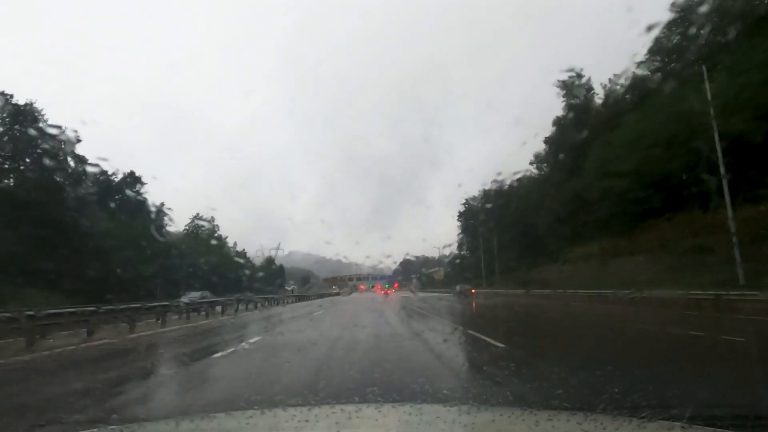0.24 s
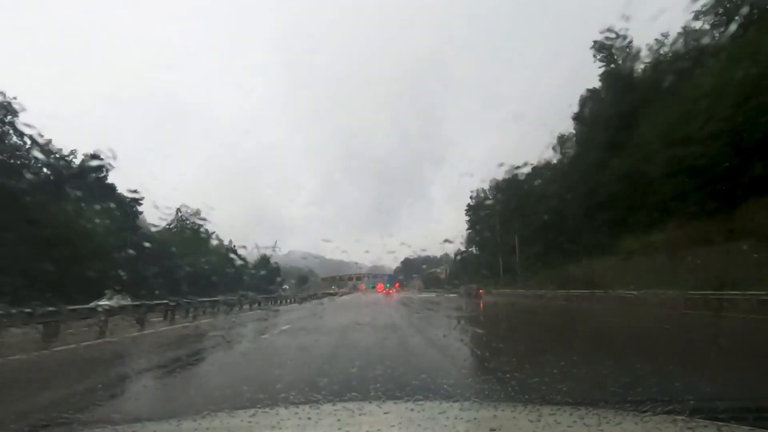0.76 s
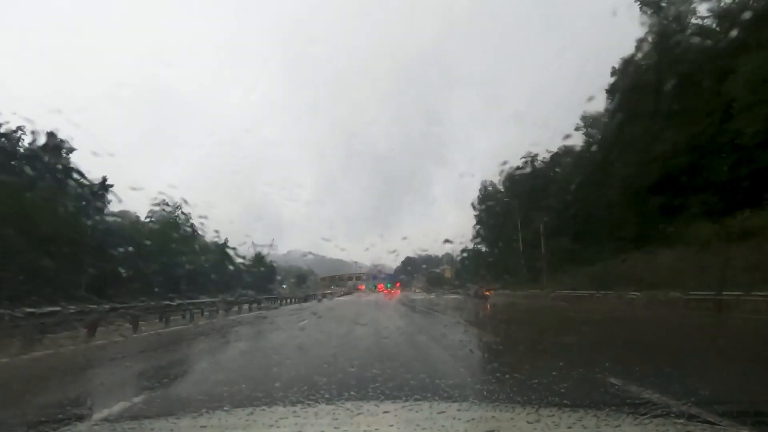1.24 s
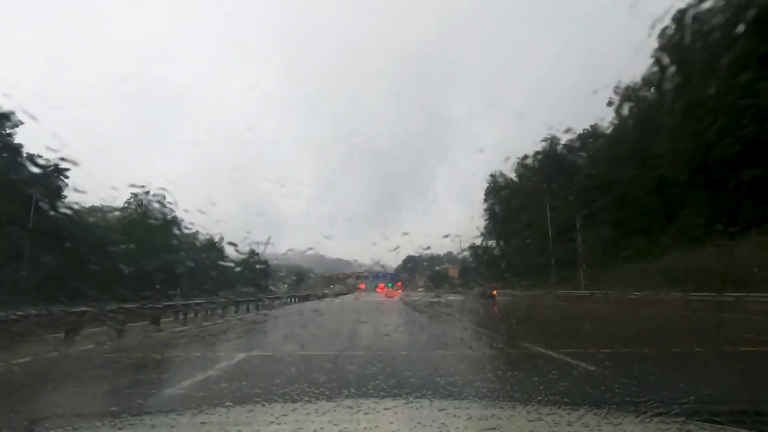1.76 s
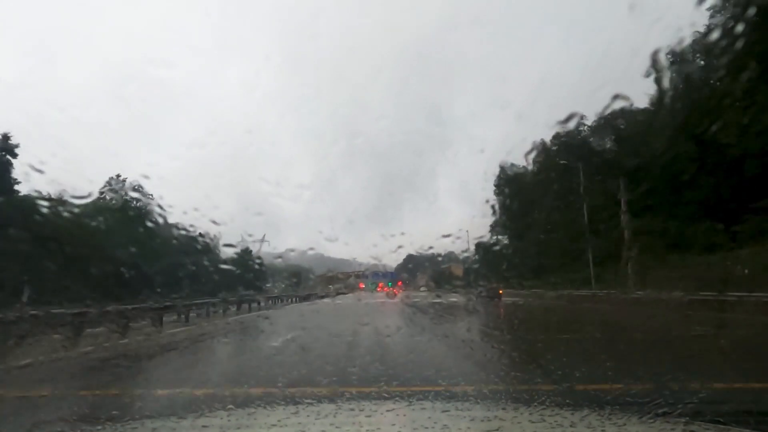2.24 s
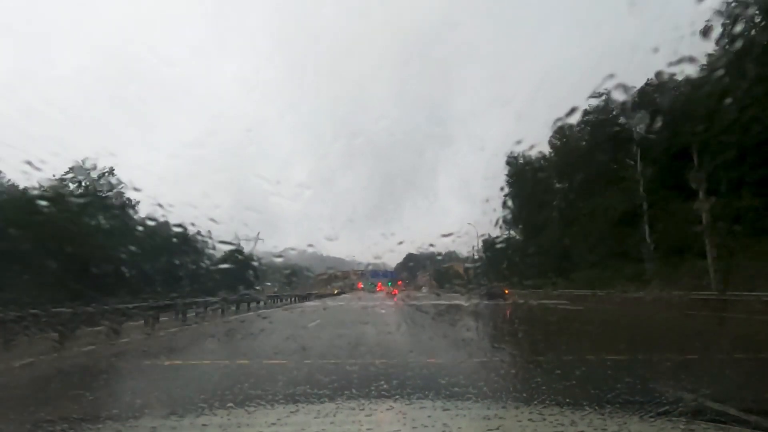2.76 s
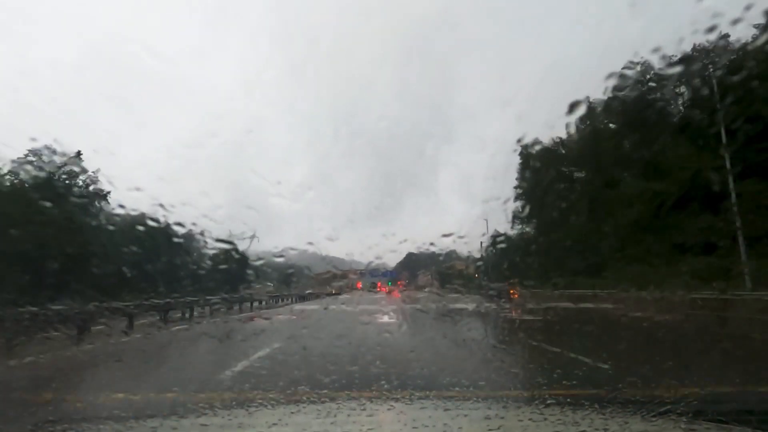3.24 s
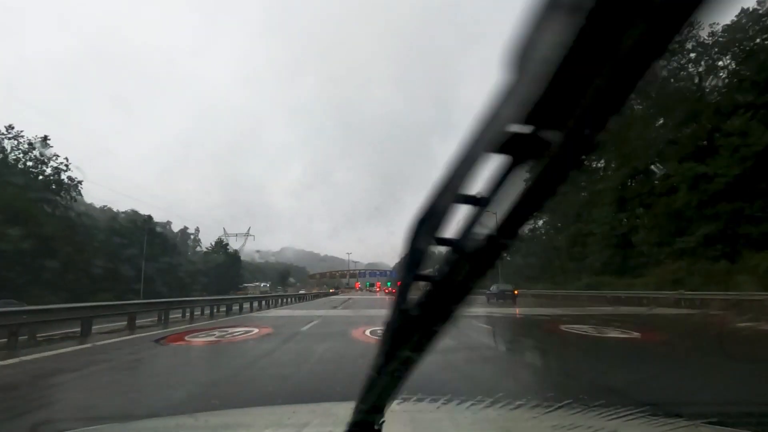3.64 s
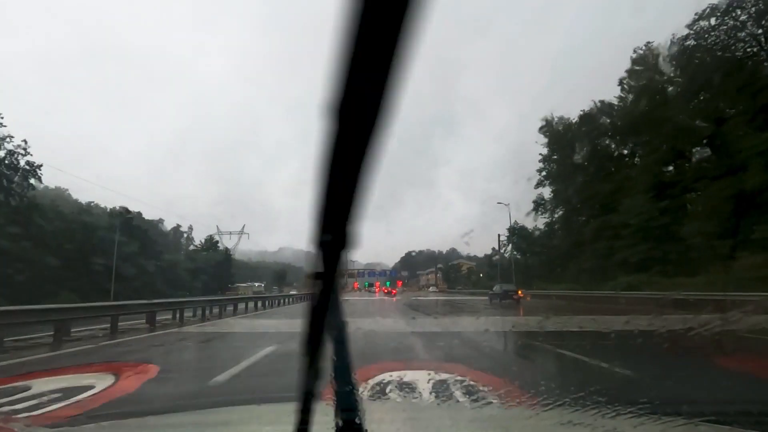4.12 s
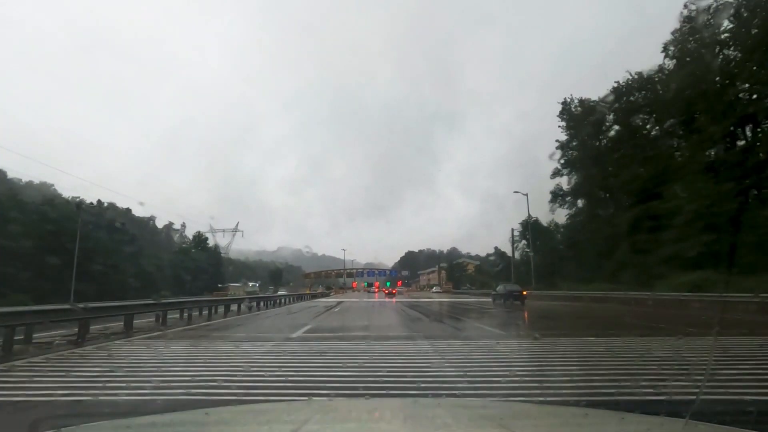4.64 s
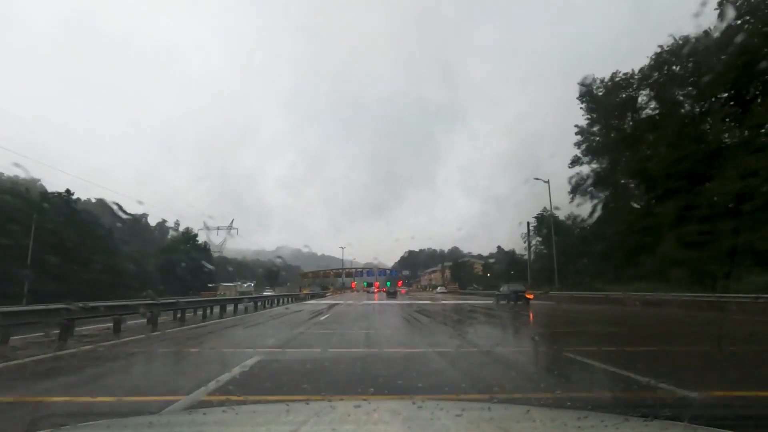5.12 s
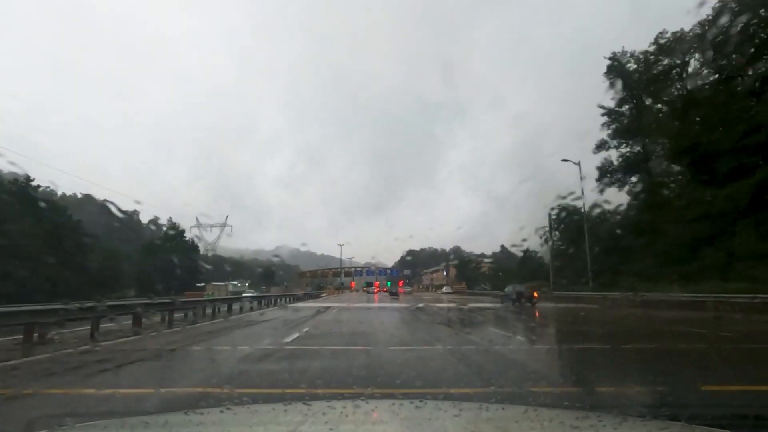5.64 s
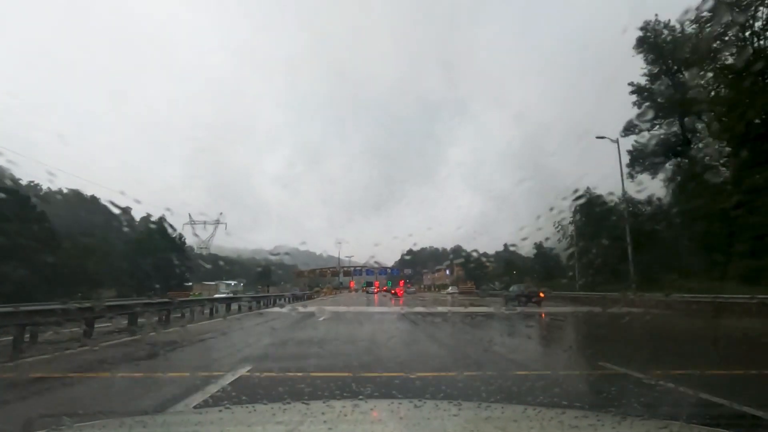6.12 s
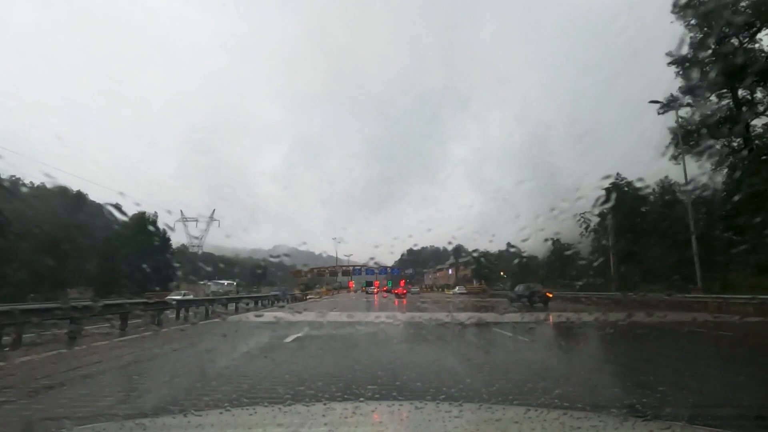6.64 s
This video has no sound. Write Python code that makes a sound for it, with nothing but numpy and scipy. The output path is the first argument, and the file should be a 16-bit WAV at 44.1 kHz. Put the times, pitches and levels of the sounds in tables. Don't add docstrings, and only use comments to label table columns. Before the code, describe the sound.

Booming wet-road rumble in a car cabin; a wiper scrapes and squeaks once, then the wheels drum across raised strips, rattling the dashboard, before quieter rolling.

```python
import sys
import numpy as np
from scipy import signal
from scipy.io import wavfile
from scipy.ndimage import uniform_filter1d

SR = 44100
rng = np.random.default_rng(int(sys.argv[2]) if len(sys.argv) > 2 else 0)


def persist_wave(psi):
    counts = np.round(np.clip(psi, -1, 1) * 32767).astype(np.int16)
    wavfile.write(sys.argv[1], SR, np.atleast_2d(counts).T)


def gain_from_db(level_db):
    decades = np.asarray(level_db, float) / 20
    return 10 ** decades


N = 302967

# (time [s], pitch [Hz], level [dB])
FIRING_TONE = [(0.0, 75.82, -24), (0.6, 73.5, -25.5), (1.43, 68.6, -23), (2.08, 65.05, -24.5),
               (2.81, 62.2, -22), (3.2, 60.05, -34), (4.07, 56.1, -34), (4.58, 52.8, -32.5),
               (4.7, 51.6, -56.5), (6.2, 49.15, -54.5), (6.35, 48.98, -39), (6.62, 48.1, -41),
               (6.87, 45.3, -18.5)]
# (time [s], level [dB], length [s])
LOAD_SURGES = [
    (0.0, -36, 0.28),
    (1.09, -36, .12),
    (1.462, -33.5, 0.087),
    (2.866, -20.5, 0.044),
    (3.21, -21, 0.1),
    (3.374, -35, 0.022),
    (3.55, -23, 0.025),
    (3.72, -30.5, 0.21),
    (6.444, -25.5, 0.11),
    (6.697, -19, 0.051),
]
# (time [s], level [dB])
ROLLING = [(0.0, 0), (0.8, 0), (1.8, -1), (2.6, -1), (3.1, -3.5), (3.4, -1.5), (4.1, -3.5), (4.45, -1.5),
           (5.0, -2.5), (5.5, -0.5), (5.6, -5.5), (5.78, -8), (6.0, -9), (6.35, -6.5), (6.87, -5.5)]
# (time [s], level [dB], length [s])
THUD_SWELLS = [(0.0, -22.5, 0.12), (0.327, -22, 0.14), (0.69, -21, 0.13), (1.002, -23.5, 0.063),
               (1.388, -20.5, 0.41), (1.77, -28, 0.088), (2.18, -19, 0.097), (2.506, -23, 0.15),
               (2.9, -19, 0.091), (3.234, -17, 0.12), (3.569, -14.5, 0.092), (3.943, -22, 0.14),
               (4.652, -20.5, 0.28), (4.998, -28, 0.066), (5.404, -29, 0.31), (5.71, -31, 0.18),
               (6.128, -21.5, 0.081), (6.429, -27.5, 0.052), (6.734, -29.5, 0.11)]
# (frequency [Hz], density [dB per Hz])
THUD_COLOUR = [(7.1, -30.5), (12, 6.5), (54, 2.5), (70, -3), (90, -4.5), (120, -37.5), (200, -120)]
# (frequency [Hz], density [dB per Hz])
ROAR_COLOUR = [(50, -28.5), (85, -3.5), (97, -9), (128, -0.5), (172, -7), (304, -11), (397, -22),
               (433, -17.5), (520, -23.5), (720, -23), (841, -32), (1120, -30), (2500, -51.5), (3250, -72),
               (5500, -120)]
# (frequency [Hz], density [dB per Hz])
SPRAY_COLOUR = [(1350, 1), (2300, -1.5), (4720, -10), (6450, -18), (8820, -27.5), (10600, -37),
                (11300, -45.5), (12300, -34.5), (12900, -51), (13800, -56.5), (14900, -62.5), (15600, -50)]
# (time [s], level [dB], length [s])
PUDDLE_SPRAY = [
    (0.85, -67.5, 0.28),
    (2.7, -77, 0.42),
    (3.754, -65, 0.082),
    (4.501, -70, 0.44),
    (6.3, -81, 0.071),
]
# (frequency [Hz], width [Hz], level [dB])
PANEL_MODES = [(254.4, 23, -44.5), (307, 29, -48.5), (446, 62, -56.5), (655, 24, -54.5), (919, 22, -57.5)]
# (time [s], length [s], level [dB])
STRIP_THUMPS = [
    (5.16, 0.04, -17),
    (5.273, 0.041, -21.5),
    (5.442, 0.045, -18),
    (5.573, 0.037, -19.5),
    (5.64, 0.039, -17),
    (5.753, 0.058, -15.5),
    (5.857, 0.044, -29),
]
# (time [s], rate [strips per s])
STRIP_RATE_CURVE = [(5.05, 38.2), (5.78, 39.6), (5.9, 35.7)]
# (time [s],
# length [s], pitch [Hz], glide [Hz per s], level [dB])
CABIN_HUMS = [(5.122, .03, 124.8, -100, -20.5), (5.13, 0.041, 86.5, -80, -20.5),
              (5.225, 0.032, 121.4, 0.1, -19.5), (5.2, 0.041, 72.8, 0.1, -20),
              (5.335, .06, 76.06, -0.5, -16), (5.38, .035, 117.7, 4, -21), (5.47, 0.054, 75.4, -4, -19.5),
              (5.505, .04, 127.8, 51, -21.5), (5.58, .05, 82.1, -41, -19.5), (5.61, .035, 120.2, 0.1, -22),
              (5.695, 0.027, 71.6, -50, -18.5), (5.75, .045, 117.2, -41, -21.5),
              (5.185, 0.038, 192.2, 80, -25.5), (5.36, .04, 202, -81, -28), (5.5, .025, 250.5, 0.1, -30.5),
              (5.675, .03, 266.1, -1, -35), (5.12, .025, 235, 300, -34), (5.345, .04, 275, 100, -33),
              (5.42, .03, 170, -200, -29), (5.5, .025, 320, 0.1, -35), (4.9, .03, 185, 0.1, -28),
              (1.55, .12, 145, 0.1, -33), (5.89, .03, 126.7, 0.1, -31), (6.04, 0.036, 127, 62, -32.5),
              (0.35, .15, 127, 1.6, -32.5), (0.2, .2, 150, -5, -32.5), (3.38, 0.11, 120, 0.1, -32.5)]
# (time [s], level [dB], length [s])
TRIM_BUZZ = [
    (5.08, -54, 0.042),
    (5.17, -33.5, 0.032),
    (5.385, -34, 0.068),
    (5.496, -35, 0.05),
    (5.652, -41.5, 0.04),
    (5.6, -46, .04),
    (5.717, -40, 0.034),
    (5.773, -43.5, 0.053),
]
# (frequency [Hz], density [dB per Hz])
TRIM_COLOUR = [(210, -14), (350, -11.5), (526, -5), (812, -2), (1170, -15.5), (1590, -14.5), (4020, -49.5),
               (6660, -47), (10000, -64), (13000, -94), (22000, -120)]
# (time [s], level [dB])
SUSPENSION_JOLTS = [
    (5.104, -28),
    (5.137, -23.5),
    (5.23, -34),
    (5.322, -28.5),
    (5.41, -29),
    (5.503, -29),
    (5.66, -39.5),
    (5.73, -38),
]
# (time [s], level [dB], length [s])
WIPER_SCRAPES = [(3.371, -34.5, 0.016), (3.405, -33, 0.014), (3.442, -37.5, 0.018), (3.464, -36.5, 0.011),
                 (3.504, -32, 0.0082), (3.533, -47, 0.02), (3.588, -43, 0.03), (3.65, -40, 0.018),
                 (3.698, -40, 0.056), (3.736, -36, 0.032), (3.77, -35, 0.021), (3.798, -35, 0.027),
                 (3.84, -45, .04), (3.873, -38, 0.012), (3.92, -30.5, 0.038), (3.97, -40.5, .04)]
# (frequency [Hz], density [dB per Hz])
RUBBER_COLOUR = [(180, -23), (300, 7.5), (385, 3), (682, 2.5), (826, -4), (1090, -5), (1720, -13),
                 (2630, -27.5), (3140, -26.5), (10000, -57), (13000, -70), (22000, -120)]
# (frequency [Hz], width [Hz], level [dB])
ARM_MODES = [(1086, 90, -8), (1440, 80, -14), (1840, 60, -24), (2210, 140, -22), (2640, 90, -27),
             (2930, 50, -28), (3690, 60, -33)]
# (time [s], level [dB], length [s])
RUBBER_SQUEAL = [
    (3.75, -56, 0.025),
    (3.801, -62, .02),
    (3.838, -52, .024),
    (3.885, -66, .012),
]
SQUEAL_HARMONICS = [-12, -9, -4, -2, -2, -12, -6, -14, -12]
# (time [s], length [s], pitch [Hz], level [dB])
TURN_SQUEAKS = [
    (3.92, .004, 2620, -42),
    (3.946, .009, 2570, -50),
    (3.962, .009, 2630, -56),
    (3.95, .008, 2950, -58),
    (3.972, .008, 2720, -57),
    (3.982, .007, 2900, -52),
]
# (time [s], length [s], pitch [Hz], glide [Hz per s], level [dB])
GLASS_GROANS = [(3.745, .05, 475, 448, -38.5), (3.73, .03, 720, 150, -43), (3.755, 0.023, 1105, 500, -43),
                (3.765, 0.026, 172.3, 100, -27.5), (3.795, 0.0149, 1062, 300, -40),
                (3.805, 0.018, 676, 600, -38), (3.79, .015, 1225, 300, -46), (3.79, .015, 1400, 200, -46),
                (3.84, .035, 1463, 200, -53), (3.872, .013, 304, 0.1, -34), (3.874, 0.012, 618, -1, -41),
                (3.875, 0.012, 921, 0.1, -48), (3.93, .016, 241.4, -500, -20),
                (3.965, 0.0072, 239, 500, -20), (3.985, .016, 254, 100, -27), (3.92, 0.018, 925, 0.1, -48)]
# (time [s], crack level [dB], knock level [dB])
TRIM_TICKS = [(1.9786, -44, -44), (3.276, -42, -43), (3.372, -45, -41), (3.386, -37, -34),
              (3.399, -51, -40.5), (3.436, -44, -44), (3.498, -33, -40), (3.726, -48, -36),
              (3.742, -48, -34), (3.786, -50, -36), (3.792, -49, -37), (3.899, -36, -40), (3.918, -50, -35),
              (4.5034, -33, -59), (5.098, -53, -47), (5.194, -43, -49), (5.318, -50, -41),
              (5.337, -38, -37), (5.3661, -38, -34), (5.3921, -35, -35), (5.407, -41, -41),
              (5.418, -38, -37), (5.433, -42, -42), (5.444, -35, -35), (5.47, -35, -33), (5.485, -42, -42),
              (5.4989, -33, -35), (5.517, -39, -39), (5.54, -44, -43), (5.626, -40, -40), (5.652, -38, -39),
              (5.679, -39, -40), (5.698, -48, -42), (5.7088, -41, -43), (6.201, -44, -48),
              (6.2639, -46, -39), (6.3264, -47, -53), (6.816, -49, -53)]
# (time [s], level [dB], pitch [Hz], decay by 60 dB [s])
SHORT_RINGS = [(3.384, -59, 3250, 0.022), (3.397, -30, 1050, .045), (3.404, -36, 900, .03),
               (3.372, -53, 2000, .03), (3.425, -35, 750, 0.044), (3.436, -43, 1600, 0.031),
               (3.74, -40, 1100, .06), (3.745, -41, 1420, 0.046), (3.786, -40, 1250, .02),
               (3.8, -33, 684, .05), (3.99, -48, 1750, .03), (5.338, -43.5, 1590, .025),
               (5.444, -45, 1700, .02), (5.627, -45, 1600, .025), (5.652, -46, 1850, .022),
               (5.679, -49, 1800, .025), (5.709, -45, 1600, .02), (5.33, -58, 4700, .015),
               (4.89, -21, 304, 0.11), (5.097, -18, 219, 0.15), (5.128, -17, 188, 0.14),
               (6.327, -38, 700, .02), (6.816, -40, 800, .02), (3.497, -33, 650, .03),
               (3.392, -29, 700, 0.033), (3.4, -46, 1640, .035), (3.498, -48, 3000, .015),
               (4.503, -43, 3480, .016), (4.503, -50, 4600, .01), (6.201, -52, 4000, .012),
               (5.194, -49, 3530, .022), (5.271, -45, 2050, .03), (5.297, -47, 3475, .022),
               (5.366, -46, 3250, .022), (5.393, -44, 3250, .02), (5.469, -42.5, 2610, .02),
               (5.498, -43, 2930, .014), (5.499, -44, 2100, .015), (5.626, -52, 2470, .025),
               (5.652, -57, 3350, .018), (5.679, -48, 2620, .018), (6.265, -53, 3100, .018)]
# (time [s], level [dB], pitch [Hz])
METAL_CHINKS = [(5.1627, -58, 6770), (5.3981, -56, 6660), (5.418, -50, 6600), (5.4264, -55, 6470),
                (5.4967, -52, 6720), (5.5054, -49, 6770), (5.5164, -59, 6890), (5.5253, -51, 6730),
                (5.5432, -59, 6390), (5.5498, -58, 6790), (5.658, -66, 6590)]
# (time [s], level [dB])
HISS_PUFFS = [(3.2744, -60), (3.753, -61), (3.899, -59.5), (5.396, -60.5), (5.505, -58), (5.632, -70),
              (6.1, -72), (6.66, -74), (6.2228, -68), (6.261, -54), (6.3242, -61), (6.835, -68)]


def engine():
    hz, db = follow(FIRING_TONE)
    level = gain_from_db(db) + swells(*np.transpose(LOAD_SURGES))
    return level * (tone(hz) + gain_from_db(-7) * tone(hz / 2) + gain_from_db(-24) * tone(hz * 2))


def road():
    rolling_db, = follow(ROLLING)
    floor_pan = gain_from_db(-4) * rumble(hz=37, width=12)
    rocking = gain_from_db(-25.5) + swells(*np.transpose(THUD_SWELLS))
    thud = rocking * gain_from_db(-5) * (noise(THUD_COLOUR, patchy_db=-1.45, size=8192) + floor_pan)
    roar = gain_from_db(rolling_db - 25.5) * noise(ROAR_COLOUR, patchy_db=1.0)
    tyres = thud + roar
    tyres -= 0.62 * resonate(tyres, follow(FIRING_TONE)[0], width=11)

    boom_db = -32.5 + 1.2 * (rolling_db - rolling_db.mean())
    boom = gain_from_db(boom_db) * rumble(hz=120.6, width=13)
    panels = np.zeros(N)
    for hz, width, db in PANEL_MODES:
        panels += gain_from_db(db) * evened(resonate(rng.standard_normal(N), hz, width))
    panels = gain_from_db(rolling_db) * bandpass(panels, 2, 200, 1300)

    wetness = gain_from_db(-54.5 + 0.99 * rolling_db) + swells(*np.transpose(PUDDLE_SPRAY))
    spray = wetness * noise(SPRAY_COLOUR, patchy_db=0.9, size=1024)
    return tyres + boom + panels + spray


def strips():
    rate, = follow(STRIP_RATE_CURVE)
    s, length, db = np.transpose(STRIP_THUMPS)
    drumming = swells(5.5, -23.5, rise=0.67, fall=0.6)
    thumps = (drumming + swells(s, db, length)) * tone(rate) + hums(CABIN_HUMS)

    t = np.arange(2000) / SR
    flare = 1.3 * np.exp(-t / 0.005) * np.minimum(t / 0.0015, 1)
    flares = np.full(N, 0.45)
    for s, *_ in TRIM_TICKS:
        add(flares, s, flare)
    buzz = swells(*np.transpose(TRIM_BUZZ)) * flares
    buzz *= gain_from_db(-2.5) * noise(TRIM_COLOUR, patchy_db=0.5, size=512)

    jolts = swells(*np.transpose(SUSPENSION_JOLTS), rise=0.027, fall=0.039)
    return thumps + buzz + jolts * gain_from_db(-3.5) * rumble(hz=190, width=160)


def wiper():
    scrape = noise(RUBBER_COLOUR, patchy_db=-1.0, size=512)
    slips = rng.standard_normal(N)
    arm = np.zeros(N)
    for hz, width, db in ARM_MODES:
        arm += gain_from_db(db) * evened(resonate(resonate(slips, hz, width), hz, width))
    drag = swells(*np.transpose(WIPER_SCRAPES)) * gain_from_db(-3.5)
    out = drag * (scrape + gain_from_db(-8.5) * evened(arm))

    squeal = swells(*np.transpose(RUBBER_SQUEAL))
    slip_rate = np.interp(np.arange(N) / SR, (3.7, 3.885), (356, 370))
    slip_rate *= 1 + 0.007 * wander(300)
    for k, db in enumerate(SQUEAL_HARMONICS, start=2):
        out += squeal * gain_from_db(db + 2.5 * wander(700)) * tone(slip_rate, k)

    uneven = 1 + 0.028 * wander(120)
    for s, length, hz, db in TURN_SQUEAKS:
        rising = hz + 2500 * (np.arange(N) / SR - s)
        out += swells(s, db, length) * tone(rising * uneven)
    return out + hums(GLASS_GROANS)


def ticks():
    out, t = np.zeros(N), np.arange(2000) / SR
    rattle = rng.standard_normal((len(TRIM_TICKS), len(t)))
    click = t == 0
    cracks = bandpass(0.05 * rattle * np.exp(-t / 0.004) + click, 3, 1050, 2600)
    knocks = bandpass(0.09 * rattle * np.exp(-t / 0.007) + click, 3, 450, 1700)
    for (s, crack_db, knock_db), crack, knock in zip(TRIM_TICKS, cracks, knocks):
        add(out, s, gain_from_db(crack_db - 2) * crack / crack.max())
        add(out, s, gain_from_db(knock_db + 1) * knock / knock.max())
    for s, db, hz, t60 in SHORT_RINGS:
        add(out, s, ring(db, hz, t60))
    for s, db, hz in METAL_CHINKS:
        add(out, s, ring(db - 1, hz, t60=0.025))
        add(out, s, ring(db - 9, hz * 1.03, t60=0.024))
        add(out, s, ring(db - 11, hz * 0.77, t60=0.02))
    return out


def splashes():
    out, t = np.zeros(N), np.arange(1500) / SR
    puffs = evened(bandpass(rng.standard_normal((len(HISS_PUFFS), len(t))), 2, 6500, 13500))
    burst = np.exp(-t / 0.011) * np.minimum(t / 0.005, 1)
    for (s, db), puff in zip(HISS_PUFFS, puffs):
        add(out, s, gain_from_db(db - 9.5) * puff * burst)
    return out


def rain():
    drops_per_s = 660
    drops = gain_from_db(5 * np.minimum(rng.exponential(1, N), 2.8)) * (rng.random(N) < drops_per_s / SR)
    patch = rng.integers(0, 8, N)
    out, t = np.zeros(N), np.arange(400) / SR
    for k, hz in enumerate(np.geomspace(900, 7500, num=8)):
        tap = np.exp(-t * hz / 2.5) * np.sin(2 * np.pi * hz * t) * (900 / hz) ** 4.5
        out += signal.oaconvolve(drops * (patch == k), tap)[:N]
    return gain_from_db(-65) * evened(out)


def evened(x):
    return x / np.sqrt(np.mean(x ** 2) + 1e-20)


def follow(rows):
    s, *columns = np.transpose(rows)
    return [np.interp(np.arange(N) / SR, s, c) for c in columns]


def add(mix, s, sound):
    part = mix[round(s * SR):][:len(sound)]
    part += sound[:len(part)]


def tone(hz, k=1):
    return np.sqrt(2) * np.cos(2 * np.pi * k * np.cumsum(hz) / SR)


def ring(db, hz, t60):
    t = np.arange(4000) / SR
    start = np.sin(np.pi / 2 * np.minimum(t / 0.00068, 1)) ** 2
    return gain_from_db(db - 60 * t / t60) * np.sin(2 * np.pi * hz * t) * start


def swells(s, db, rise, fall=None):
    fall = rise if fall is None else fall
    ms = np.arange(0, N / SR + 0.001, 0.001)
    lag = ms[:, None] - s
    bells = gain_from_db(db) * np.exp(-(lag / np.where(lag < 0, rise, fall)) ** 2)
    return np.interp(np.arange(N) / SR, ms, bells.sum(axis=1))


def hums(rows):
    out = np.zeros(N)
    for s, length, hz, glide, db in rows:
        t = np.arange(-3 * length, 3 * length, 1 / SR)
        sound = gain_from_db(db) * np.exp(-(t / length) ** 2) * tone(hz + glide * t)
        before_start = max(round((3 * length - s) * SR), 0)
        add(out, max(s - 3 * length, 0), sound[before_start:])
    return out


def wander(size):
    return evened(uniform_filter1d(rng.standard_normal(N), size=size))


def bandpass(x, order, low, high):
    return signal.sosfilt(signal.butter(order, [low, high], "bandpass", fs=SR, output="sos"), x)


def resonate(x, hz, width):
    turn = np.exp(2j * np.pi * np.cumsum(hz * np.ones(len(x))) / SR)
    r = np.exp(-np.pi * width / SR)
    return 2 * (turn * signal.lfilter([1 - r], [1, -r], x / turn)).real


def rumble(hz, width):
    return evened(resonate(resonate(rng.standard_normal(N), hz, width), hz, width))


def noise(shape, patchy_db, size=2048):
    hop, hz = size // 4, np.fft.rfftfreq(size, 1 / SR)
    a, b, patches = rng.standard_normal((N // hop + 5, len(hz), 3)).T
    patches = uniform_filter1d(uniform_filter1d(patches, size=16, axis=0), size=8, axis=1)
    f, db = np.transpose(shape)
    colour = np.interp(np.log(hz + 1), np.log(f + 1), db, left=-90, right=-120)
    z = (a + 1j * b) * gain_from_db(colour[:, None] + patchy_db * evened(patches))
    return evened(signal.istft(z, nperseg=size, noverlap=size - hop)[1][:N])


def gate(x):
    hz, _, z = signal.stft(x, SR, nperseg=2048)
    power = uniform_filter1d(uniform_filter1d(abs(z) ** 2, size=24, axis=1), size=4, axis=2)
    limit = np.median(power[:, np.searchsorted(hz, 10500)])
    ease_db = np.clip(0.0045 * (hz - 9600), 0, 8)
    limit = limit / gain_from_db(ease_db)[:, None] ** 2
    return signal.istft(z * (power > limit), SR, nperseg=2048)[1][:, :N]


def scene():
    return (engine() + road() + strips() + wiper() + ticks() + splashes() + rain())[None]


def roll_off(x):
    return signal.sosfilt(signal.butter(12, 15710, fs=SR, output="sos"), x)


def record(dry):
    start = np.minimum(np.arange(N) / (0.004 * SR), 1)
    bass = signal.sosfiltfilt(signal.butter(2, 400, fs=SR, output="sos"), dry)
    rounded = start * (dry - bass + 0.6 * np.tanh(bass / 0.6))
    mix = gate(rounded)
    return roll_off(mix)


dry = scene()
out = record(dry)
persist_wave(out)
```